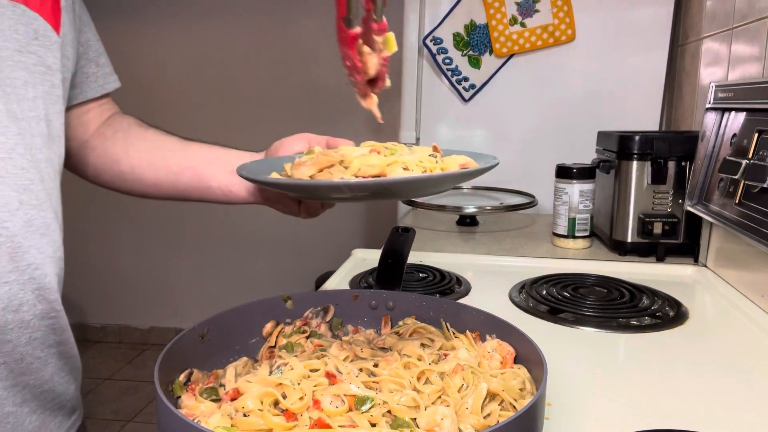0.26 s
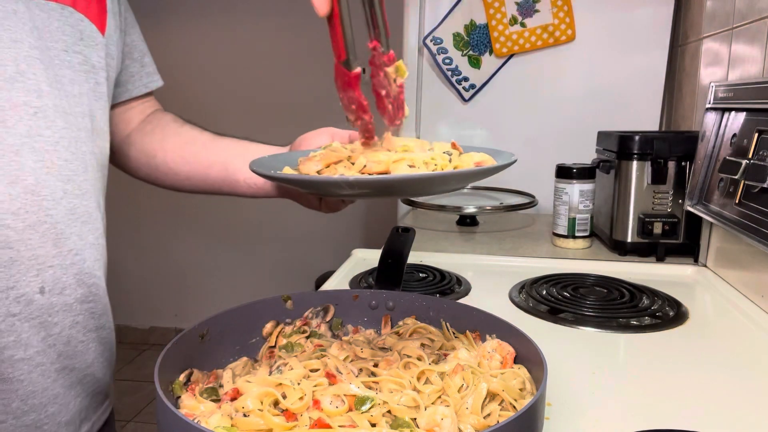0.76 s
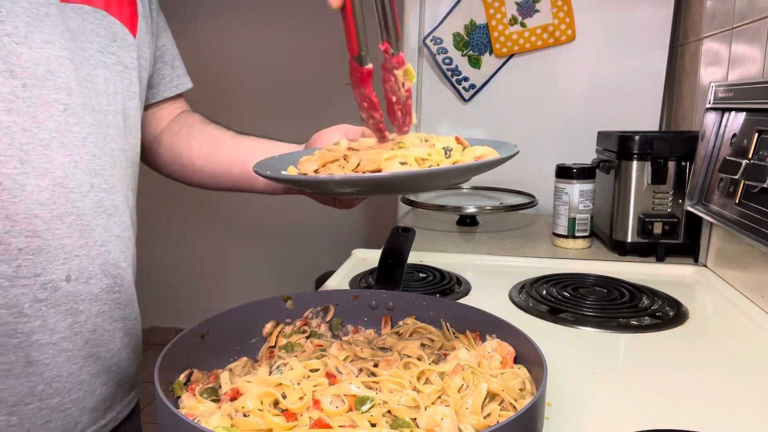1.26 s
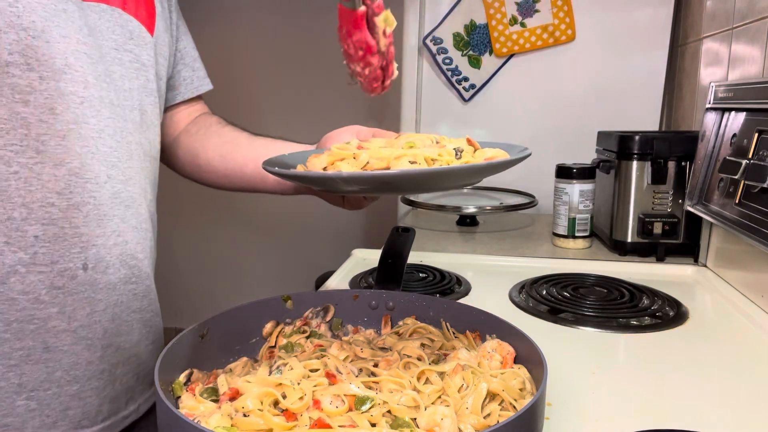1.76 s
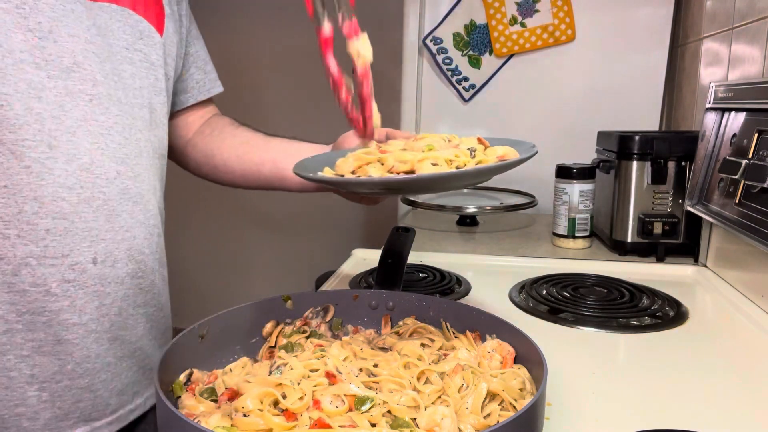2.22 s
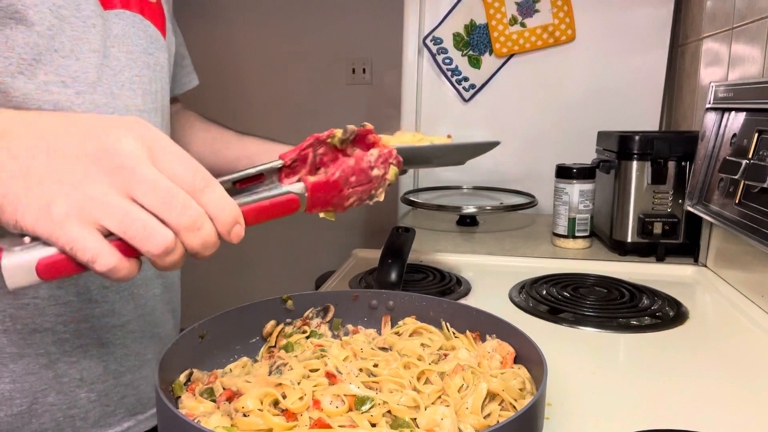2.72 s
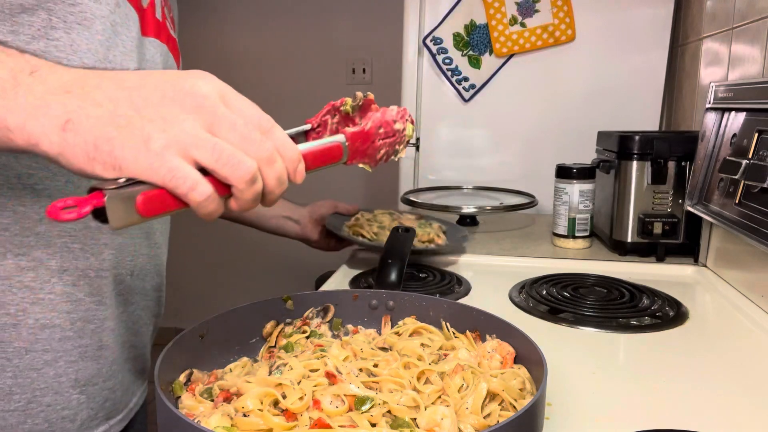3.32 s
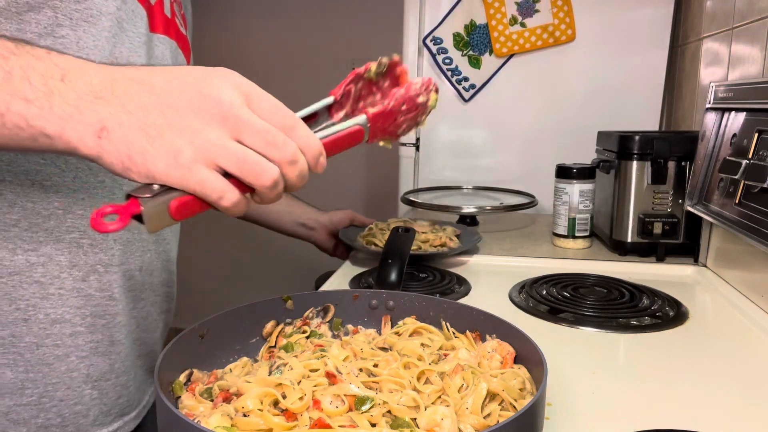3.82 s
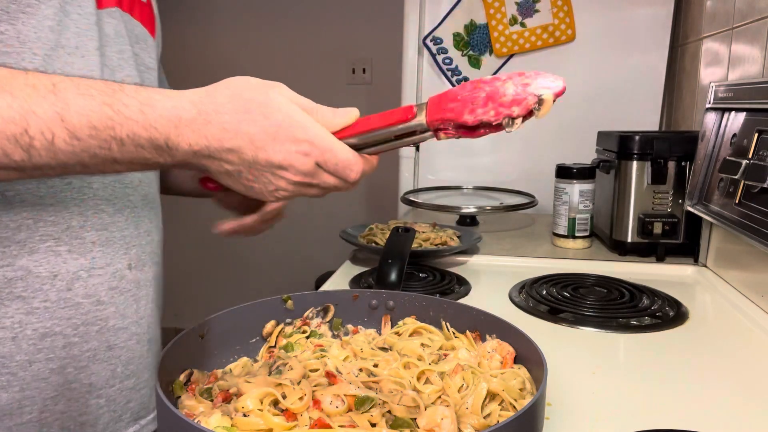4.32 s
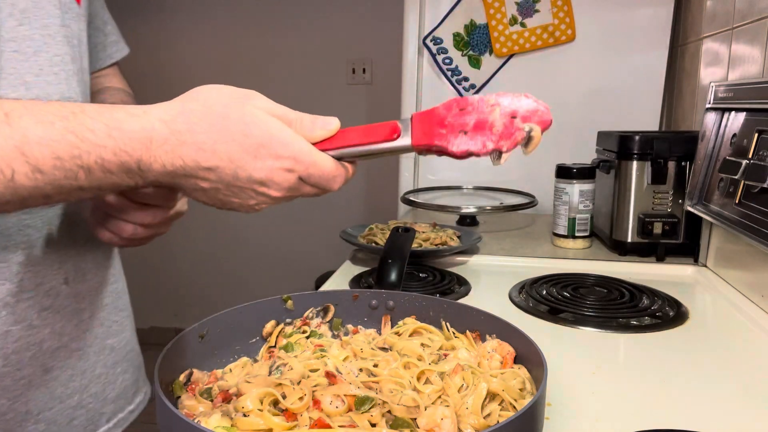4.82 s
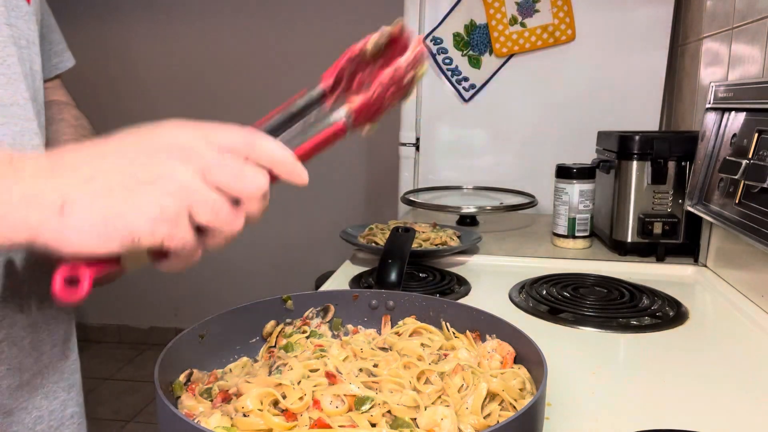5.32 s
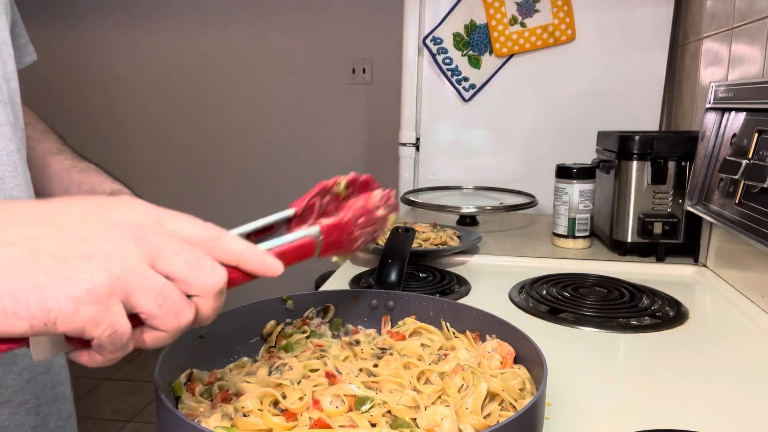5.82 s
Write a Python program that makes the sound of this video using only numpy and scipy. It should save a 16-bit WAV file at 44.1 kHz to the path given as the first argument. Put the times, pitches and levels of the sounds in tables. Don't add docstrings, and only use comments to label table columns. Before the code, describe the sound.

Faint sleeve rustle and sticky clicks in a small kitchen, a few metallic clacks, and three loud rattling knocks of a plate set down.

```python
import sys
import numpy as np
from scipy import signal
from scipy.fft import rfft, irfft
from scipy.io import wavfile

SR = 44100
rng = np.random.default_rng(int(sys.argv[2]) if len(sys.argv) > 2 else 0)


def persist_wave(psi):
    counts = np.round(np.clip(psi, -1, 1) * 32767).astype(np.int16)
    wavfile.write(sys.argv[1], SR, np.atleast_2d(counts).T)


def nominal_scale(level):
    x = np.asarray(level, float) / 20
    return 10 ** x


N = 267687


def rms_one(x):
    return x / np.sqrt(np.mean(x ** 2) + 1e-20)


def at_hz(points, hz):
    table = np.array(points)
    return np.interp(np.log(hz + 1), np.log(table[:, 0] + 1), table[:, 1])


def coloured(x, spectrum):
    size = x.shape[-1]
    gain = nominal_scale(at_hz(spectrum, np.fft.rfftfreq(size, 1 / SR)))
    return irfft(rfft(x) * gain, size)


def drift(steps_per_s):
    steps = rng.standard_normal(400)
    return np.interp(np.arange(N) / SR * steps_per_s, np.arange(400), steps) * 1.22


def ring(clicks, hz, t60):
    r = nominal_scale(-60 / (max(t60, 1e-4) * SR))
    w = 2 * np.pi * min(hz, 0.45 * SR) / SR
    return signal.lfilter([0, np.sin(w)], [1, -2 * r * np.cos(w), r * r], clicks + 1e-18)


def add(out, x, s):
    at = round(s * SR)
    out[:, at:at + x.shape[1]] += x[:, :N - at]


def patchy_noise(spectrum, patchy_db, rate):
    bins = rfft(coloured(rng.standard_normal((2, N)), spectrum))
    octave = np.log2(np.fft.rfftfreq(N, 1 / SR) / 30 + 1e-9)
    together, out = drift(rate), 0
    for k in range(10):
        share = np.clip(1 - abs(octave - k), 0, 1)
        flicker_db = patchy_db * (0.7 * together + 0.92 * drift(2.7 * rate))
        out = out + irfft(bins * share, N) * nominal_scale(flicker_db)
    return rms_one(out)


# (time [s], level [dB])
STIR = [(0, -70.5), (.4, -70.5), (.65, -67), (1.4, -68.5), (1.9, -71.5), (2.9, -70.5), (3.2, -70),
        (4.202, -68.5), (5.0, -69), (5.45, -65.5), (5.65, -67), (5.85, -66.5), (6.07, -71.5)]


def stirring():
    return np.interp(np.arange(N) / SR, *np.transpose(STIR))


# (frequency [Hz], density [dB per Hz])
RUMBLE = [(13, -50), (22, -11), (37, -8), (59, -1), (88, -3.5), (113, -6), (146, -11.5), (300, -27.5),
          (390, -48.5), (660, -120)]


def room_rumble(stir_db, stove_murmur):
    level = np.hypot(nominal_scale(-59.5 + 0.4 * stir_db), nominal_scale(-43.5) * stove_murmur)
    return level * patchy_noise(RUMBLE + [(600, -67.0)], patchy_db=0.5, rate=9.6)


# (frequency [Hz], density [dB per Hz])
AIR = [(88, -31), (150, -0.5), (211, -6), (255, -11.5), (470, -2.5), (561, -11), (827, -8.5), (898, -15),
       (1440, -16), (1760, -26.5), (2500, -31), (3250, -44.5), (5500, -120)]


def room_air(stir_db, stove_murmur):
    level = np.hypot(nominal_scale(-62 + 0.4 * stir_db), nominal_scale(-29.5) * stove_murmur)
    return level * patchy_noise([(70, -44.5)] + AIR + [(6000, -55.5)], patchy_db=0.5, rate=3.0)


# (frequency [Hz], density [dB per Hz])
RUSTLE = [(1000, -9.5), (1800, -1), (2600, 3), (4500, -0.5), (6500, -3), (8000, 1), (10000, -12.5),
          (14500, -13), (16200, -31)]


def sleeve_rustle(rustle_db):
    return nominal_scale(rustle_db + 2.5) * patchy_noise([(400, -46.5)] + RUSTLE, patchy_db=2.5, rate=13.0)


# (frequency [Hz], density [dB per Hz])
RUB = [(900, -24), (1600, -2), (2600, 0.5), (4000, -9), (6500, -11.5), (9000, -29.5)]


def finger_rub(rustle_db):
    return nominal_scale(rustle_db - 8.5) * patchy_noise(RUB, patchy_db=8.0, rate=27.0)


def crackle(per_s):
    happens = rng.random(N) < per_s / SR
    snaps = nominal_scale(3.5 * np.minimum(rng.exponential(1, N), 3)) * happens
    dealt, signs = rng.integers(0, 10, N), rng.choice([-1, 1], (2, N))
    out = 0
    for k, hz in enumerate(np.geomspace(2200, 13000, 10)):
        out = out + ring(snaps * signs * (dealt == k), hz, 11.0 / hz)
    return out


# (time [s], peak level [dB], centre [Hz])
TICKS = [(0.1, -51, 5200), (0.2444, -49.5, 2140), (0.305, -47, 4970), (0.4459, -45, 6800),
         (0.5526, -62, 3270), (0.7428, -45, 5160), (0.8739, -50.5, 5280), (0.9263, -47.5, 6240),
         (0.98, -48, 3500), (1.2261, -50.5, 2650), (1.268, -50, 4590), (1.394, -49.5, 5950),
         (1.4545, -49, 6050), (1.8527, -51, 4630), (2.3323, -54.5, 6040), (2.4282, -45.5, 9300),
         (2.4771, -50.5, 4760), (2.5192, -49, 5350), (2.9425, -56.5, 4400), (3.044, -51, 3860),
         (3.2879, -50.5, 5470), (4.3247, -48, 5500), (4.356, -49, 5000), (4.9852, -52, 5820),
         (5.1903, -38.5, 6410), (5.2757, -46, 11000), (5.435, -31, 12500), (5.475, -40, 12240),
         (5.524, -46, 12270), (6.066, -32.5, 12900)]


def ticks(out):
    for s, peak_db, hz in TICKS:
        click = np.zeros((2, 400))
        click[:, :24] = rng.standard_normal((2, 24)) * nominal_scale(-1.5 * np.arange(24))
        snap = ring(ring(click, hz, 15.0 / hz), hz, 15.0 / hz)
        snap = snap / abs(snap).max(axis=1, keepdims=True)
        snap = snap + nominal_scale(-10.5) * np.diff(click, prepend=0)
        add(out, nominal_scale(peak_db - 1.5) * snap, s)


# (frequency [Hz], t60 [s])
KITCHEN = [(60, .8), (160, 0.55), (420, .42), (1100, .38), (2900, 0.39), (7700, 0.35), (15000, 0.21)]


def kitchen(dry):
    size = int(0.9 * SR)
    t, white, tail = np.arange(size) / SR, rng.standard_normal((2, 2, size)), 0
    edges_hz = 22 * 2 ** np.arange(0, 9.8, 1 / 3)
    for k, (low, high) in enumerate(zip(edges_hz, edges_hz[1:])):
        bandpass = signal.butter(2, [low, high], "band", fs=SR, output="sos")
        band = signal.sosfilt(bandpass, white[k % 2])
        t60 = at_hz(KITCHEN, np.sqrt(low * high))
        tail = tail + band * nominal_scale(-60 * t / t60) / np.sqrt(t60 * SR)
    swell = 1 - np.exp(-t / 0.012)
    return signal.fftconvolve(dry, tail * swell, axes=1)[:, :N]


# (time [s], peak level [dB],
# centre [Hz], bright edge [dB])
CLACKS = [(2.089, -27, 2722, -28), (2.098, -37, 3160, -26.5), (2.103, -30, 3025, -41),
          (3.341, -33, 2000, -50), (3.349, -27, 2200, -49), (3.357, -17.5, 5590, -28),
          (3.657, -33, 2007, -30), (3.856, -23, 2500, -13), (2.092, -37, 816, -45),
          (4.217, -38.5, 2227, -51.5), (4.225, -45.5, 2700, -53), (4.518, -40.5, 2605, -28),
          (4.651, -38.5, 2920, -24.5), (4.658, -26, 2800, -15.5), (4.664, -31, 2223, -31),
          (4.662, -33, 960, -44.5), (4.672, -35.5, 1330, -31.5), (5.005, -43.5, 2570, -35.5)]


def clacks(out):
    wide, length_s = 2 ** 0.81, 0.016
    for s, peak_db, hz, edge_db in CLACKS:
        body = [(hz / wide ** 2, -40), (hz / wide, -12), (hz, 0), (hz * wide, -12)]
        edge = [(9000, edge_db), (14000, edge_db), (22000, edge_db - 9)]
        noise = rms_one(coloured(rng.standard_normal((2, 4096)), sorted(body + edge)))
        fade_db = -30 * np.arange(4096) / SR / length_s
        add(out, nominal_scale(peak_db - 4.5 + fade_db) * noise, s)


def touches(s, peak_db, hard_db, rocking_s):
    gap_s, rocking_loss_db, softening_db = 0.008, 6, 7.5
    k = np.arange(8)
    rocks = np.minimum(k, 1)
    late = gap_s * (k + rocks * rng.uniform(-0.25, 0.25, 8))
    peaks_db = peak_db - rocking_loss_db * (late / rocking_s) ** 2
    return np.transpose([s + late, peaks_db, hard_db - softening_db * rocks])


def knock(out, landing, modes, rattle, ring_db, damping, rattle_db, thump_db):
    size, start, thump_hz = int(0.5 * SR), landing[0], landing[4]
    times, peak_db, hard_db = touches(*landing[:4]).T
    at = np.round((times - start) * SR).astype(int)

    thump_t60 = 5.4 / thump_hz
    thump = ring(ring(np.arange(size) == 20, thump_hz, thump_t60), thump_hz, thump_t60)
    sound = np.ones((2, 1)) * nominal_scale(thump_db) * thump / abs(thump).max()

    for hz, level_db, t60 in modes:
        blows = np.zeros((2, size))
        blow_db = peak_db + level_db + ring_db + rng.normal(0, 3, (2, len(at)))
        blows[:, at] = nominal_scale(blow_db) * rng.choice([-1, 1], (2, len(at)))
        soft = signal.butter(2, 1.6 * hz, fs=SR, output="sos")
        sound += signal.sosfilt(soft, ring(blows, hz, min(t60, 0.55) * damping))

    noise = rms_one(coloured(rng.standard_normal((2, size)), rattle))
    dull = signal.sosfilt(signal.butter(1, 1500.0, fs=SR, output="sos"), noise)
    for k, first in enumerate(at):
        t = np.arange(size - first) / SR
        fade = nominal_scale(peak_db[k] + rattle_db - 60 * t / 0.047) * (1 - np.exp(-t / 0.0018))
        burst = dull + nominal_scale(hard_db[k]) * (noise - dull)
        sound[:, first:] += fade * burst[:, first:]

    no_bass = signal.butter(2, 54.7, "high", fs=SR, output="sos")
    add(out, signal.sosfilt(no_bass, sound), start)


# (frequency [Hz], level [dB], t60 [s])
RING_1 = [(161, -22, 0.16), (376.7, -23.5, 0.68), (1008, -1.5, 0.39), (1110, -20, 0.14), (1190, -10, 0.074),
          (2191, -12.5, 0.15), (3030, -34, 0.3), (3690, -30, 0.52), (4170, -37, 0.35), (5513, -25.5, 0.35)]
RING_2 = [(187.5, -8.5, 0.73), (298.2, -8, 0.36), (863, 4.5, 0.26), (1138, -5.5, 0.17), (1400, -4.5, 0.73),
          (2210, -17.5, 0.9), (2446, -17.5, 0.97), (2970, -9, 0.2), (3705, -19, 0.45), (4834, -29.5, 0.3),
          (5460, -21, 0.3)]
RING_3 = [(86.1, -14, 0.46), (339, -7.5, 0.77), (437, 6.5, 0.11), (624, 0, 0.11), (738, -9.5, 0.22),
          (823, -15.5, 0.24), (1410, -22.5, 0.22), (1690, -21.5, 0.29), (2240, -26, 0.13),
          (3190, -36, 0.18), (3750, -31, 0.35), (5420, -39, 0.25)]
# (frequency [Hz], density [dB per Hz])
RATTLE_1 = [(35, -42.5), (60, -23), (164, -4), (222, -21), (492, -2), (636, -8.5), (1100, -7.5),
            (1600, -12.5), (5590, -26), (8120, -32.5), (13300, -46.5), (16000, -109)]
RATTLE_2 = [(35, -46.5), (60, -24), (164, -1), (233, -36), (330, 2), (698, -4.5), (842, -1), (3670, -24),
            (6900, -32), (7940, -43), (13500, -37), (16000, -95.5)]
RATTLE_3 = [(35, -39.5), (60, -14), (130, -4), (189, -11), (315, 1.5), (354, -4.5), (593, -10.5),
            (882, -6.5), (1410, -11), (1580, -18), (12100, -56), (16000, -69.5)]
# (time [s], peak level [dB], hardness [dB], rocking time [s], thump [Hz])
KNOCKS = [
    (3.356, 2, 1.5, 0.029, 2270),
    (3.662, -3, 4.5, 0.021, 1300),
    (3.856, -6.5, 6.5, 0.038, 601),
]


def plate_landing(out):
    knock(out, KNOCKS[0], RING_1, RATTLE_1, ring_db=-13.5, damping=0.35, rattle_db=-9.5, thump_db=-12.5)
    knock(out, KNOCKS[1], RING_2, RATTLE_2, ring_db=-18, damping=0.37, rattle_db=-8.5, thump_db=-6)
    knock(out, KNOCKS[2], RING_3, RATTLE_3, ring_db=-11.5, damping=0.4, rattle_db=-5.5, thump_db=-3.5)


def murmur():
    landings = np.array(KNOCKS)
    t = np.maximum(np.arange(N) / SR - landings[:, :1], 0)
    decay = nominal_scale(landings[:, 1:2] - 60 * t / 0.88)
    return np.sum(decay * (1 - np.exp(-t / 0.06)), axis=0)


def scene():
    rustle_db, stove_murmur = stirring(), murmur()
    stir_db = rustle_db - rustle_db.mean()
    background = room_rumble(stir_db, stove_murmur) + room_air(stir_db, stove_murmur)
    background += sleeve_rustle(rustle_db) + finger_rub(rustle_db)

    wet, tongs, plate = np.zeros((3, 2, N))
    ticks(wet)
    crackles_per_s = 150 * nominal_scale(stir_db + 4.8 * drift(6.2))
    wet += nominal_scale(-61.0) * crackle(crackles_per_s)
    clacks(tongs)
    plate_landing(plate)
    echoes = kitchen(nominal_scale(6.5) * plate + nominal_scale(6) * tongs + nominal_scale(7.0) * wet)
    return plate + tongs + wet + echoes + background


# (frequency [Hz], coherence [0-1, clipped])
PORT_ALIKE = [(60, 1.1), (200, 1.37), (550, 0.32), (1400, .5), (2000, 0.25), (6300, -0.74)]
# (frequency [Hz], phase [radians])
PORT_PHASE = [(0, 0.5), (520, 1.28), (1290, 1.11), (2670, -1.06), (3190, 2.6), (6030, 4)]
# (frequency [Hz], left lead [half turns])
PORT_TREBLE = [(7300, .95), (9000, 1.1), (10500, 1.9), (12800, 2.1), (13900, 2.9), (16500, 3.1)]
# (frequency [Hz], level [dB])
PORT_BALANCE = [(60, -2), (200, -4.5), (400, -1), (2000, -3), (4000, -3.5), (5600, -8.5), (6800, -3.5)]


def microphone_ports(dry):
    hz, treble_hz = np.fft.rfftfreq(N, 1 / SR), PORT_TREBLE[0][0]
    own, right = rfft(dry)
    alike = np.clip(at_hz(PORT_ALIKE + [(treble_hz, 0.96)], hz), 0, 1)
    phase = PORT_PHASE + [(f, np.pi * half) for f, half in PORT_TREBLE]
    turn = np.exp(1j * np.interp(hz, *np.transpose(phase)))
    left = alike * turn * right + np.sqrt(1 - alike ** 2) * own
    balance_db = at_hz(PORT_BALANCE + [(treble_hz, 0)], hz)
    return irfft([left * nominal_scale(balance_db / 2), right * nominal_scale(-balance_db / 2)], N)


def top_cut(x):
    return signal.sosfilt(signal.butter(12, 16650, fs=SR, output="sos"), x)


def record(dry):
    ports = microphone_ports(dry)
    rounded = 0.98 * np.tanh(ports / 0.98)
    return top_cut(rounded)


dry = scene()
out = record(dry)
persist_wave(out)
```